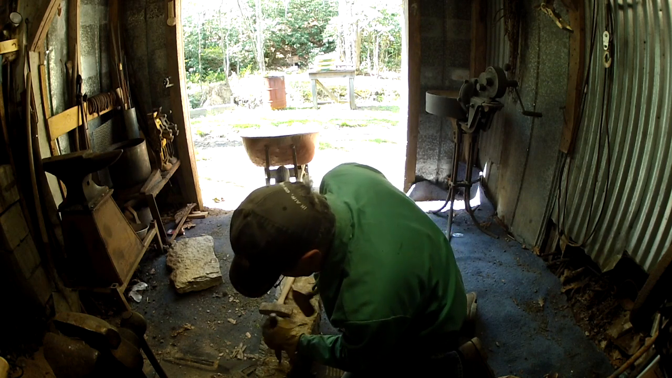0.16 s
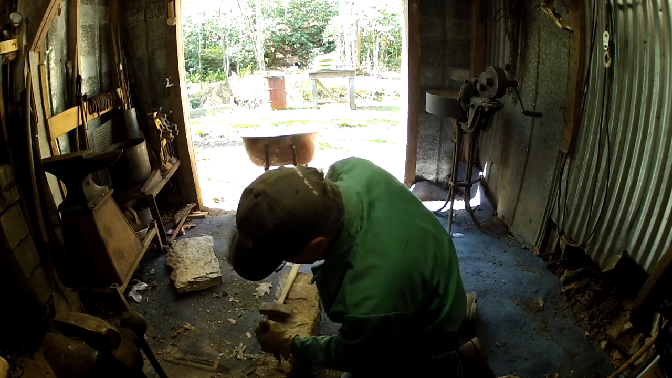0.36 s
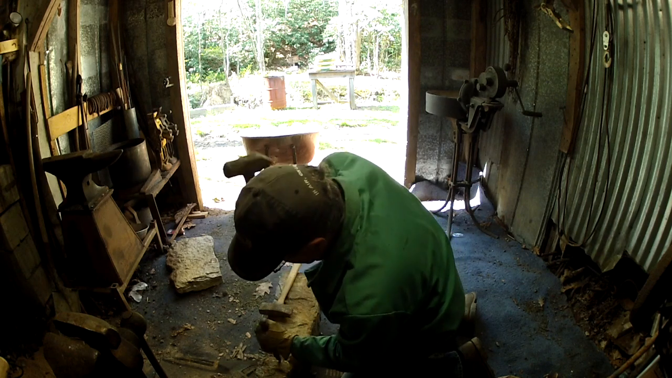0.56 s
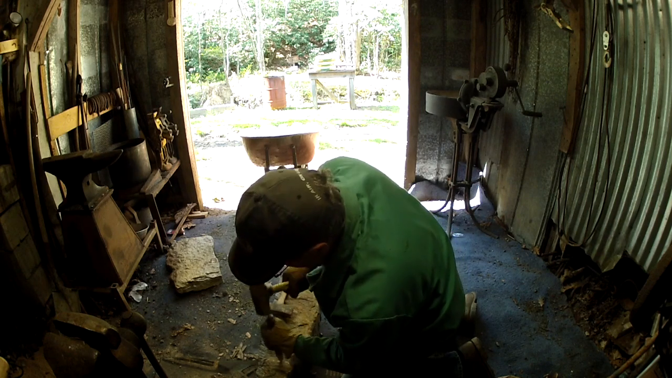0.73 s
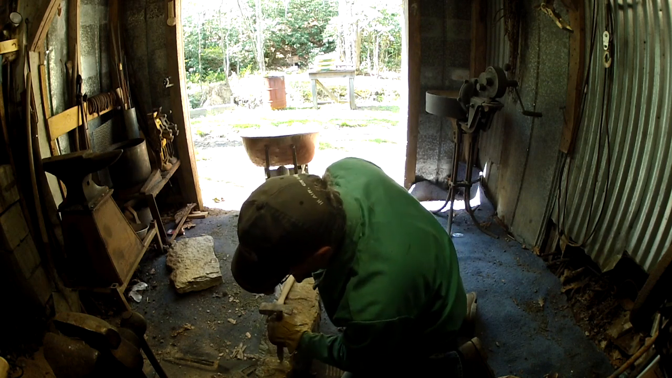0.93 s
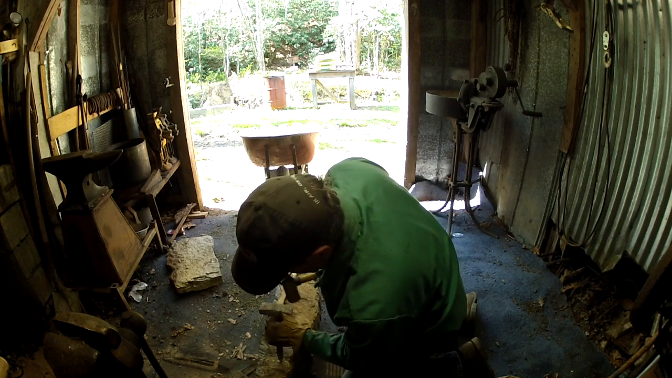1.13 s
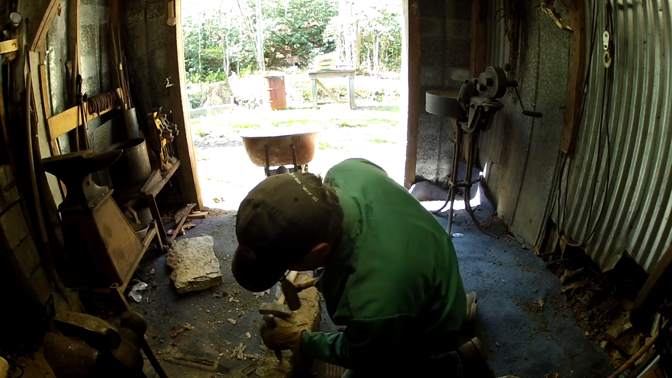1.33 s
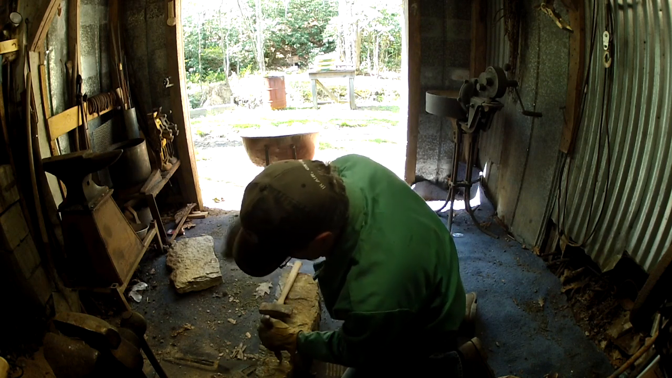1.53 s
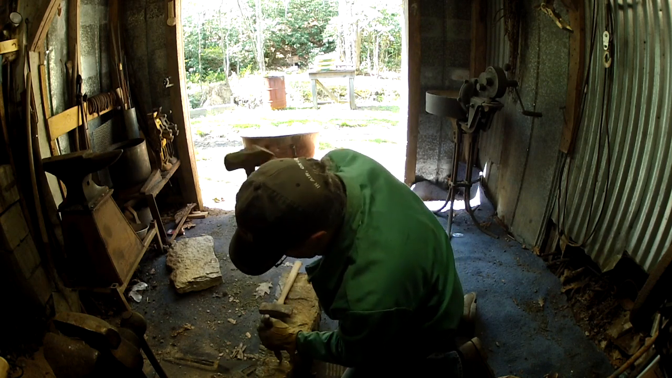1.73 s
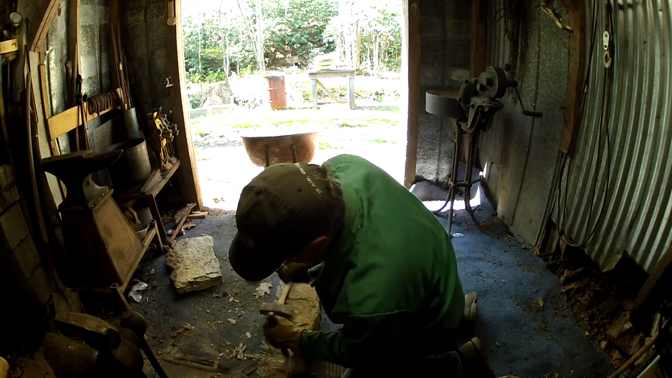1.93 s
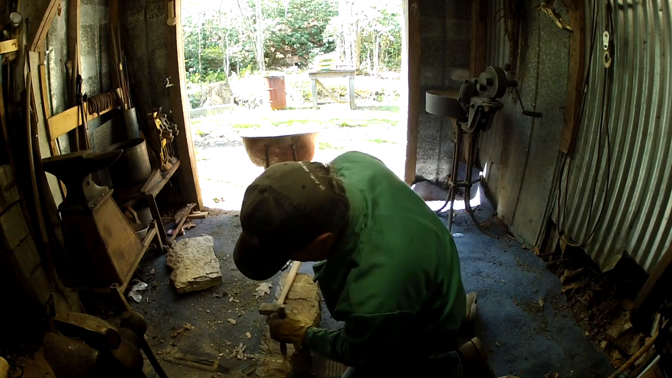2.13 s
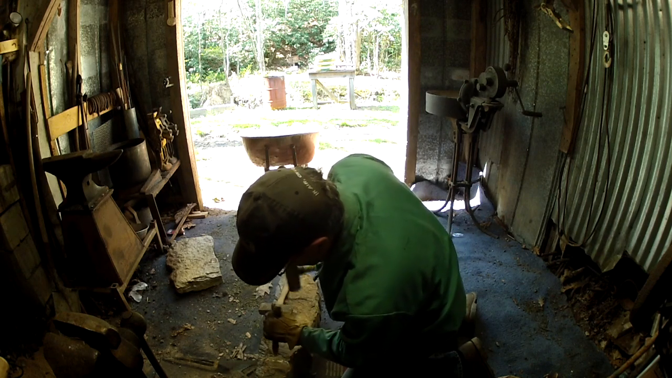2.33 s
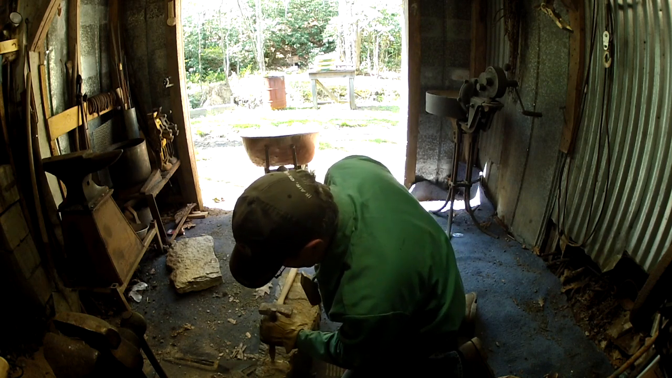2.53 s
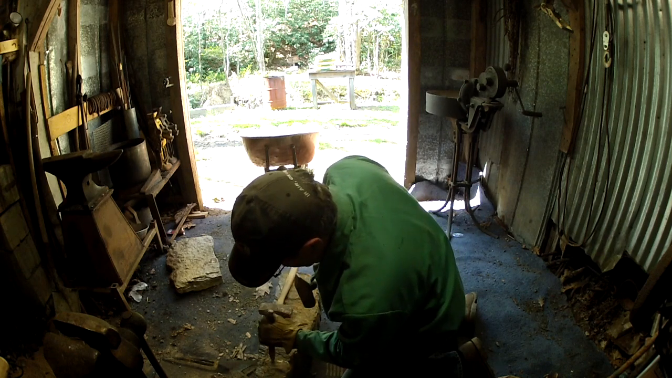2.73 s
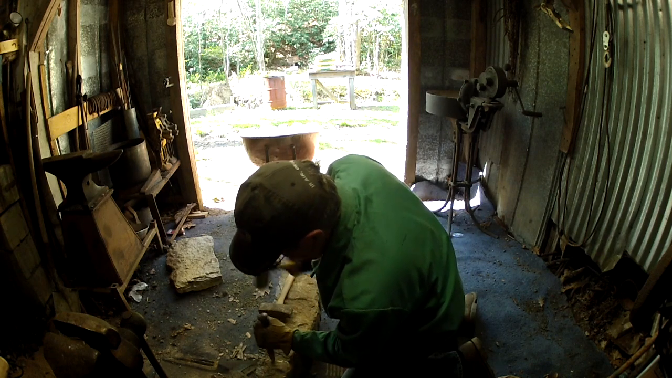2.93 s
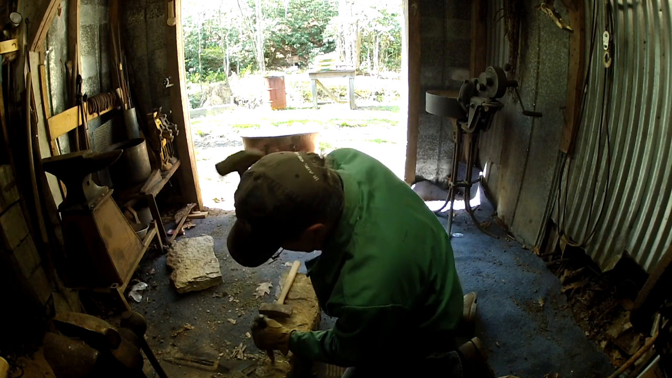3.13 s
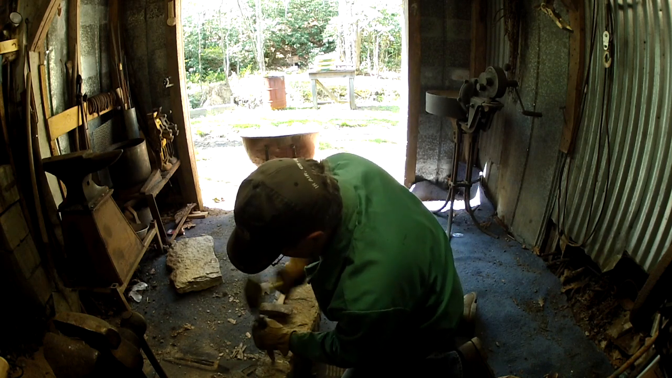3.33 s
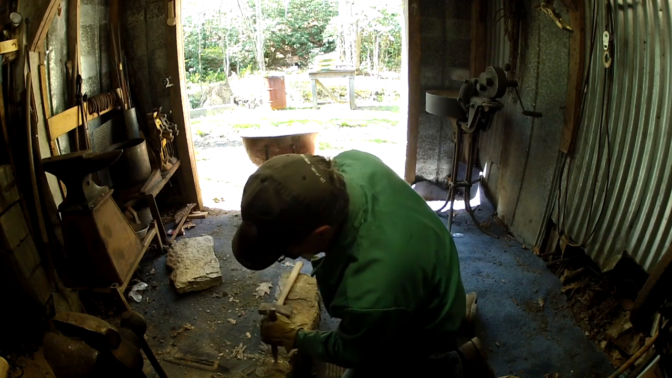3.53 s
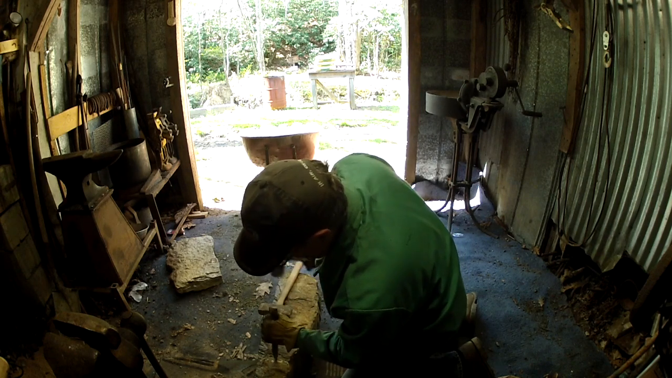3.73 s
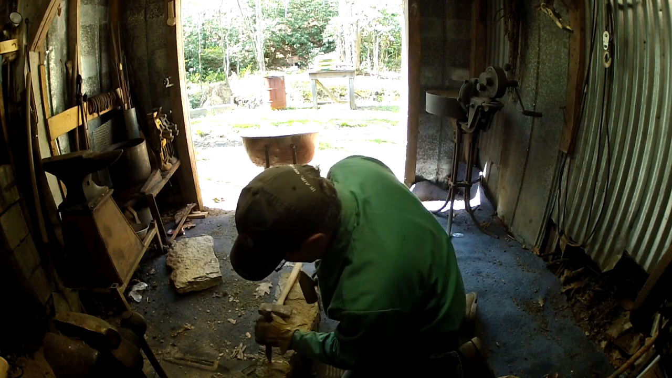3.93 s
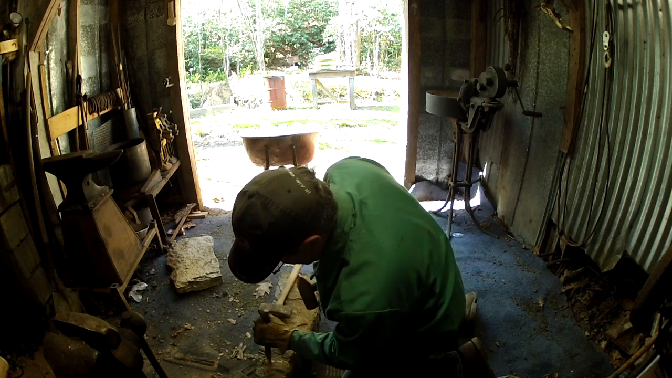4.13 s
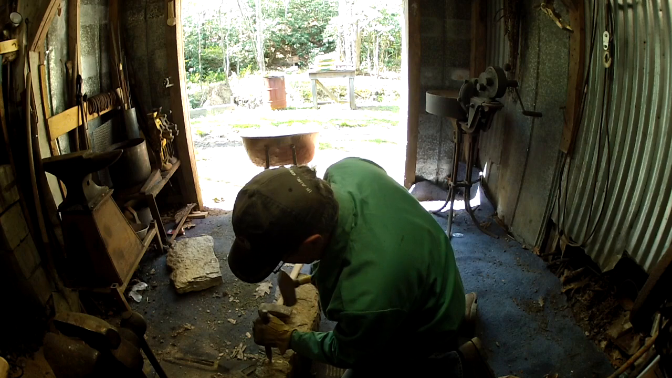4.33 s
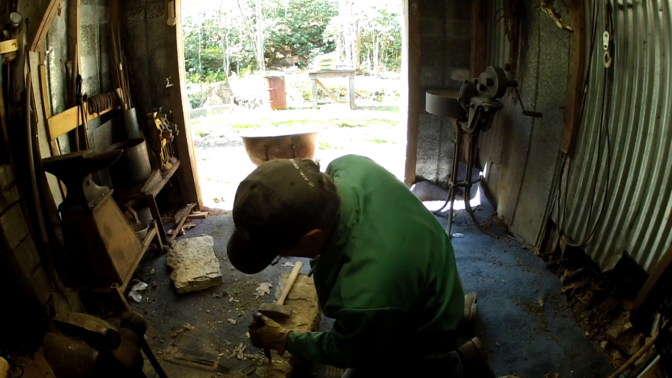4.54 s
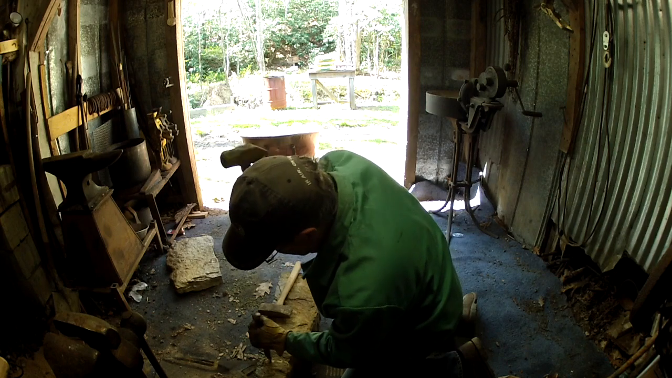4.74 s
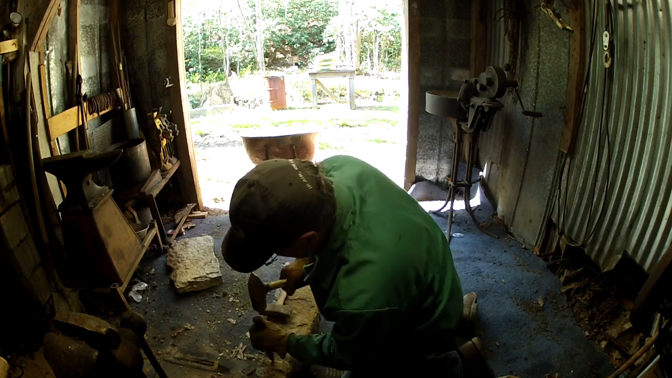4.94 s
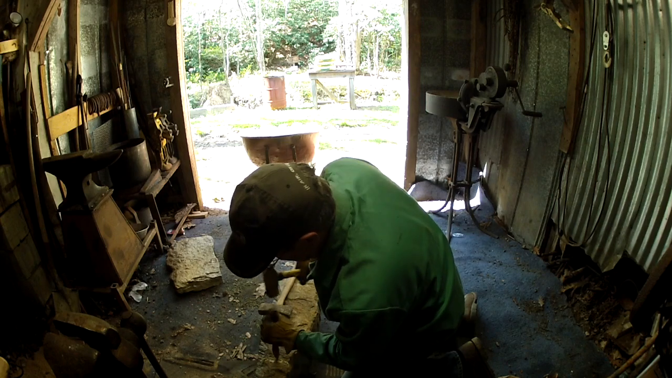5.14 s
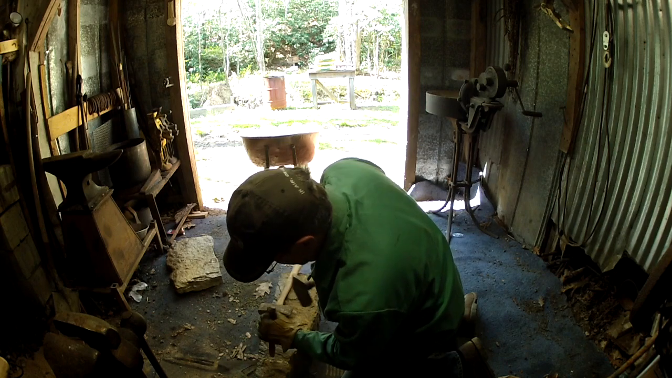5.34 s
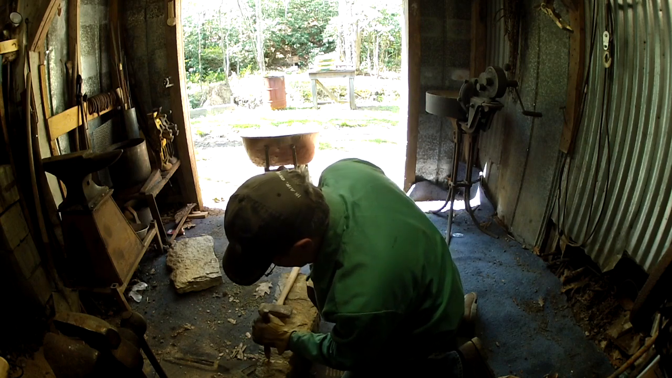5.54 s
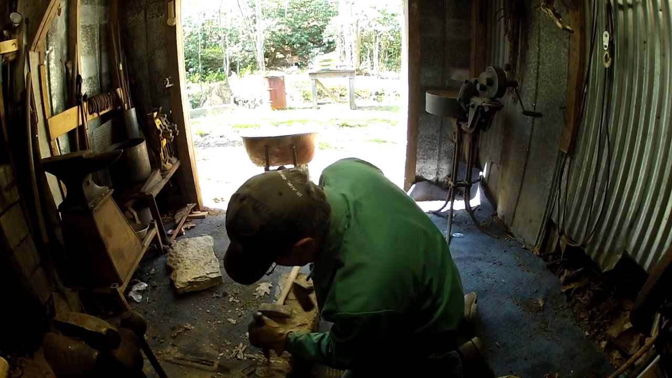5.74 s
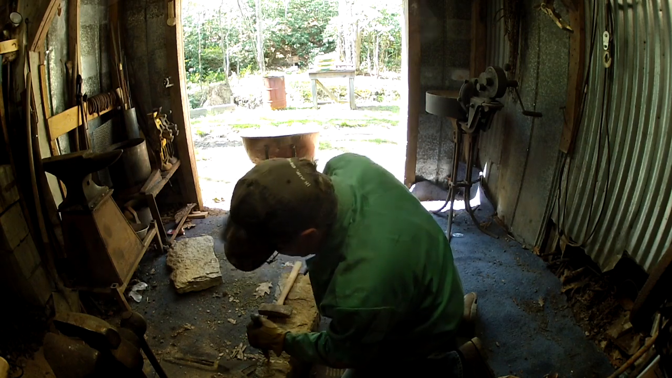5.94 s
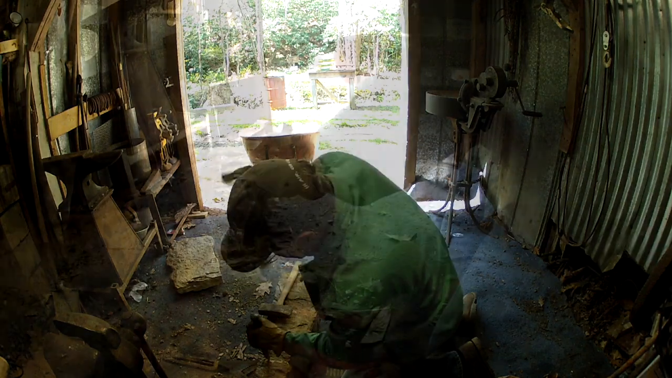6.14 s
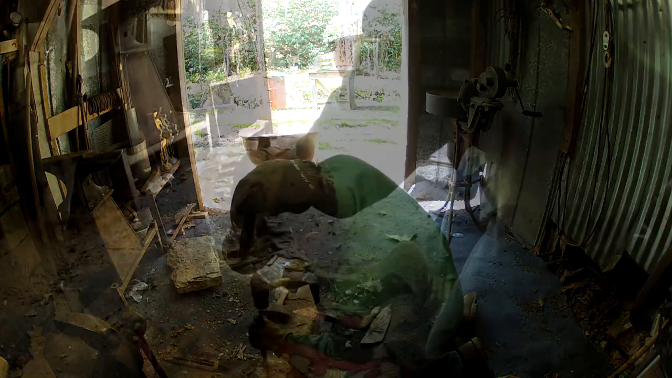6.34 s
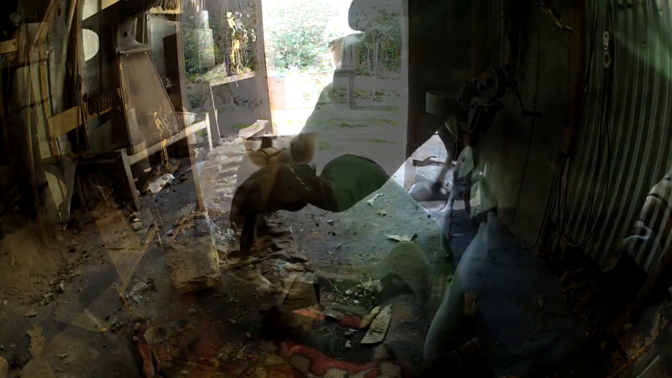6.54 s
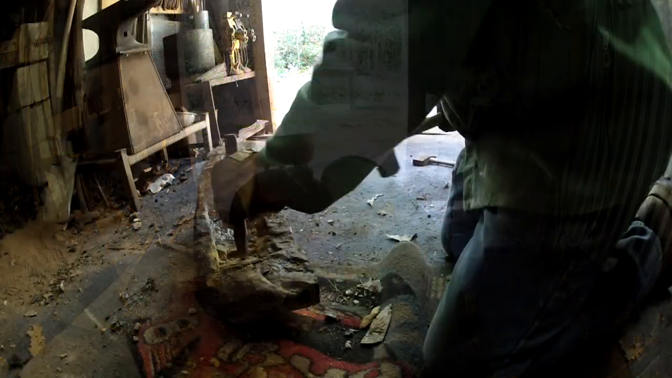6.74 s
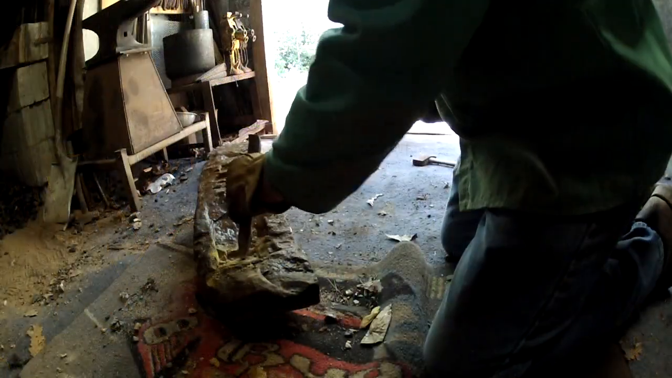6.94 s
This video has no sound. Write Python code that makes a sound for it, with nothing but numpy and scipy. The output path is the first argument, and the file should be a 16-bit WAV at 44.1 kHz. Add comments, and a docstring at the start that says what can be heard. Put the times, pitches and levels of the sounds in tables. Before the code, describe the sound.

A hammer cracks a chisel into a stone block at a slow pace, short dry metallic clinks, faint falling crumbs, steady mains hum and rumble beneath.

```python
"""A hammer drives a steel chisel into a stone block on the floor of a small tin shed.
Each blow mixes fading sine tones for steel and stone with short noise bursts; chips and crumbs land after some.
A mains hum and a low rumble fill the shed; near the end the sound dissolves into a second shot with a weaker hum.
The small camera turns itself down after each blow, adding deep soft thumps (partly drawn as plain low tones);
it also clips, and holds each sample of a 12 kHz converter."""
import sys
import numpy as np
from scipy import signal
from scipy.fft import rfft, irfft
from scipy.io import wavfile
from scipy.ndimage import uniform_filter1d

SR = 44100
rng = np.random.default_rng(int(sys.argv[2]) if len(sys.argv) > 2 else 0)


def to_wav(s):
    """Save 16-bit WAV."""
    ch = np.atleast_2d(s).T  # columns
    pcm = np.round(np.clip(ch, -1, 1) * 32767)  # PCM
    wavfile.write(sys.argv[1], SR, pcm.astype(np.int16))


N = 312228   # length in samples, about 7 s
AFTER = np.arange(SR // 2) / SR   # seconds since a contact

# hammer on chisel: start_s, force_db, ring_share (part of the free ringing time), then levels relative
# to the force: crack_db, grit_db, block_db, thud_db, deep_db (low thump of the camera's moving gain); last thud_hz
HAMMER_BLOWS = [(0.7591, -4, 0.37, 2.5, 3.5, 1, 11.5, -40, 302),
                (1.9385, -1, 0.36, 1, -10, 0.5, 0, -9.5, 338),
                (3.4026, 3.5, 0.35, 2, -10.5, -2.5, -0.5, -15, 370),
                (4.9403, -1, 0.48, -1, -3.5, -12.5, 4, -30, 342),
                (6.312, -4.5, 0.81, 4, -2, -14.5, 3, -32, 337)]


def blows():
    """Full blows ring the steel and crumble the stone, with a short thud and a brief low thump from the camera."""
    out = np.zeros(N)
    for start_s, force_db, ring_share, crack_db, grit_db, block_db, thud_db, deep_db, thud_hz in HAMMER_BLOWS:
        thud_shape = dying(0.018) * (1 - dying(0.0064))
        thud = from_db(thud_db) * np.sin(2 * np.pi * thud_hz * AFTER) * thud_shape
        deep = from_db(deep_db) * deep_thump(0.03, rise_s=0.0033)
        stone = steel_on_stone(crack_db, block_db, ring_share) + from_db(grit_db) * grit(0.12)
        out = in_shed(out, start_s, from_db(force_db) * (stone + thud + deep))
    return out


# chisel set back on the stone: start_s, force_db
CHISEL_TAPS = [(2.6033, -35.5), (4.04, -56), (5.601, -43)]
TAP_RING_SHARE, TAP_CRACK_DB, TAP_BLOCK_DB = 0.5, -5, -5


def taps():
    """Light touches of the chisel ring steel and stone, without the grit and thuds of a full blow."""
    out = np.zeros(N)
    for start_s, force_db in CHISEL_TAPS:
        contact = steel_on_stone(TAP_CRACK_DB, TAP_BLOCK_DB, TAP_RING_SHARE)
        out = in_shed(out, start_s, from_db(force_db) * contact)
    return out


# tones of the steel chisel: pitch_hz, level_db, t60_s (time to lose 60 dB when ringing freely)
CHISEL_TONES = [(2275, -5, 0.22), (2326, -4.5, 0.17), (2345, -21.5, 0.31), (5650, -6, 0.12)]
# tones of the stone block: pitch_hz, level_db, t60_s
BLOCK_TONES = [(570, -8, 0.016), (753, -8.5, 0.0092), (1113, 1, 0.053), (1230, -2, 0.0061),
               (1770, -5, 0.0017), (3200, -31.5, 0.036), (3650, -7.5, 0.034), (4230, -5.5, 0.004),
               (4660, -34, 0.004)]
# colour of the cracking noise: pitch_hz, level_db (per Hz)
CRACK_COLOUR = [(150, -15.5), (500, -7.5), (1000, -12), (2500, -4.5), (4000, 1), (6000, 1.5), (9000, -24)]


def steel_on_stone(crack_db, block_db, ring_share):
    """The chisel rings, the stone cracks in a short noise burst, the block rings briefly."""
    crack = coloured(CRACK_COLOUR, size=AFTER.size) * dying(0.019) * (1 - dying(0.0017))
    chisel = ringing(CHISEL_TONES, spread_db=2.0, share=ring_share)
    block = ringing(BLOCK_TONES, spread_db=4.5)
    return chisel + from_db(crack_db) * crack + from_db(block_db) * block


# colour of the crumbling noise: pitch_hz, level_db (per Hz)
GRIT_COLOUR = [(150, -4.5), (500, -6.5), (1200, -3), (2500, -5.5), (4300, -10), (6000, -17.5),
               (9000, -10.5)]


def grit(t60):
    """Crumbs of stone: noise broken into uneven grains, dying away."""
    grain = 60   # samples, about 1.4 ms
    strengths = rng.exponential(1, AFTER.size // grain + 1) ** 1.1
    strengths = uniform_filter1d(strengths, size=2)
    grains = rms_one(np.repeat(strengths, grain)[:AFTER.size])
    return coloured(GRIT_COLOUR, size=AFTER.size) * grains * dying(t60)


DEEP_HZ = 55.7


def deep_thump(t60, rise_s):
    """A deep soft thump of the camera's moving gain, drawn as one low tone that swells and dies."""
    return np.sin(2 * np.pi * DEEP_HZ * AFTER) * dying(t60) * (1 - dying(rise_s))


# broken-off pieces landing: start_s, level_db, tilt_db (brightness per octave), rattle_db, rattle_t60_s,
# deep_db (low thump of the camera's gain, relative to level_db)
FALLING_CHIPS = [(.852, -37, -8, -12, .045, -30), (2.0577, -24.5, -3, -6, .08, -11),
                 (3.506, -31, 3, -6, .25, -7)]
BOUNCE_S, BOUNCE_LOSS_DB = 0.03, 8
# single crumbs landing: start_s, level_db
FALLING_CRUMBS = [(3.769, -65), (3.831, -62), (4.275, -60), (5.168, -52.5)]
CRUMB_TILT_DB, CRUMB_RATTLE_DB, CRUMB_RATTLE_S = 4, 7, 0.07


def chips():
    """Pieces touch three times, ever softer; a deep soft thump comes with the second touch; crumbs touch once."""
    out = np.zeros(N)
    for start_s, level_db, tilt_db, rattle_db, rattle_s, deep_db in FALLING_CHIPS:
        for bounce in range(3):
            touch = landing(tilt_db, rattle_db, rattle_s)
            touch_db = level_db - BOUNCE_LOSS_DB * bounce
            out = in_shed(out, start_s + BOUNCE_S * bounce ** 1.2, from_db(touch_db) * touch)
        # stands for the camera's gain as it finishes climbing back
        deep = from_db(level_db + deep_db) * deep_thump(0.25, rise_s=0.02)
        out = in_shed(out, start_s + BOUNCE_S, deep)
    for start_s, level_db in FALLING_CRUMBS:
        touch = landing(CRUMB_TILT_DB, CRUMB_RATTLE_DB, CRUMB_RATTLE_S)
        out = in_shed(out, start_s, from_db(level_db) * touch)
    return out


# tones of a small stone piece, before the brightness tilt: pitch_hz, level_db, t60_s
PIECE_TONES = [(490, -9, .025), (1380, 0, .045), (2570, -2, .04), (4030, -10, .025)]


def landing(tilt_db, rattle_db, rattle_s):
    """One touch of the floor: a gritty rattle and the short tones of the piece."""
    # the tilt turns around 2000 Hz
    tones = [(hz, db + tilt_db * np.log2(hz / 2000), t60) for hz, db, t60 in PIECE_TONES]
    return ringing(tones, spread_db=1.5) + from_db(rattle_db) * grit(rattle_s)


def ringing(modes, spread_db, share=1):
    """Every tone is struck once, with a strength and slight pitch of its own; a grip shortens the ring."""
    hz, db, t60 = np.transpose(modes)[:, :, None]
    chance = rng.standard_normal((2, len(modes), 1))
    sines = np.sin(2 * np.pi * hz * (1 + 0.002 * chance[0]) * AFTER)
    strengths = from_db(db + spread_db * chance[1])
    return np.sum(strengths * dying(t60 * np.clip(share, 0.2, 2)) * sines, axis=0)


def dying(t60):
    """Fade that loses 60 dB in t60 seconds."""
    return 1000.0 ** (-AFTER / t60)


# how long the shed's main echo lasts: pitch_hz, t60_s
SHED_ECHO = [(100, 0.12), (500, 0.12), (1500, 0.082), (3000, 0.11), (6000, 0.13)]
SHED_DB, SHED_FIRST_S = -2.5, 0.003   # echo strength and wait before the first echo
WALLS_DB, WALLS_T60_S = -34.5, 0.53   # the tin walls keep a faint echo going for longer


def in_shed(out, start_s, contact):
    """Add a contact and its shed echoes, made of fading noise bands that differ with each spot struck."""
    echoes = np.zeros(AFTER.size)
    edges = 70 * 2.0 ** np.arange(8)   # octave bands, in Hz
    for low, high in zip(edges, edges[1:]):
        band = signal.butter(2, [low, high], "band", fs=SR, output="sos")
        noise = signal.sosfilt(band, rng.standard_normal(AFTER.size))
        main_fade = dying(at_hz(SHED_ECHO, np.sqrt(low * high)))
        echoes += noise * (main_fade + from_db(WALLS_DB) * dying(WALLS_T60_S))
    echoes = echoes * (AFTER > SHED_FIRST_S)
    echoes = from_db(SHED_DB) * echoes / np.sqrt(np.sum(echoes ** 2))
    sound = contact + signal.fftconvolve(contact, echoes)[:AFTER.size]
    start = round(start_s * SR)
    placed = np.zeros(N + AFTER.size)
    placed[start:start + AFTER.size] = sound
    return out + placed[:N]


# colour of the low rumble: pitch_hz, level_db (per Hz)
RUMBLE_COLOUR = [(15, -25), (40, -21), (80, -14), (160, -16), (280, -7.5), (380, -16), (600, -18),
                 (1000, -24), (1500, -31), (2000, -32.5), (2350, -30.5), (2900, -35), (5500, -41),
                 (8000, -63.5)]
HUM_HZ = 120.0
HUM_DB, RUMBLE_DB = -41, -43   # first shot
SECOND_HUM_DB, SECOND_RUMBLE_DB = -8.5, -1   # second shot, relative to the first
SECOND_HUM_TURNS = 0.43   # where in its cycle the second hum starts


def background(hum_db, rumble_db, turns):
    """A hum at twice the mains rate that wavers a little, over a nearly steady rumble of coloured noise."""
    cycles = HUM_HZ * np.arange(N) / SR + turns
    hum = np.sqrt(2) * np.sin(2 * np.pi * cycles + 0.05 * drift(4.0))
    hum = hum * from_db(hum_db + 1.2 * drift(4.0))
    rumble = coloured(RUMBLE_COLOUR, size=N) * from_db(rumble_db + 0.13 * drift(1.0))
    return hum + rumble


def drift(rate):
    """Slow random wandering of spread 1; a higher rate (Hz) wanders faster."""
    step = 40   # samples between the points that are computed
    r = np.exp(-2 * np.pi * step * rate / SR)
    noise = rng.standard_normal(N // step + 2002)
    slow = signal.lfilter([1], [1, -2 * r, r * r], noise)[2000:]   # drop the filter's start-up
    return np.interp(np.arange(N) / step, np.arange(len(slow)), rms_one(slow))


def coloured(spectrum, size):
    """Noise with the given spectrum, rms 1."""
    hz = np.maximum(np.fft.rfftfreq(size, 1 / SR), 1)
    white = rfft(rng.standard_normal(size))
    return rms_one(irfft(white * from_db(at_hz(spectrum, hz)), size))


def at_hz(points, hz):
    """Read a table at any pitch, between its points on a log-pitch axis."""
    points = np.array(points)
    return np.interp(np.log(hz), np.log(points[:, 0]), points[:, 1])


def from_db(db):
    """Decibels to gain."""
    return 10 ** (np.asarray(db) / 20)


def rms_one(x):
    """Scale to unit rms."""
    return x / np.sqrt(np.mean(x ** 2) + 1e-20)


DUCK_START_DB, DUCK_STEP_DB = -15.5, 0.45
DUCK_WAIT_S, DUCK_ATTACK_S = 0.0012, 0.0013
DUCK_RELEASE_DB_S = 140   # dB regained per second


def duck_gain(x):
    """A loud burst pulls the gain down within milliseconds; it climbs back in small even steps."""
    level = signal.lfilter([0.01], [1, -0.99], np.abs(x))
    over_db = np.maximum(20 * np.log10(level + 1e-9) - DUCK_START_DB, 0)
    # hold the highest excess while letting it sink at the release rate
    ramp = DUCK_RELEASE_DB_S * np.arange(N) / SR
    held_db = np.maximum.accumulate(over_db + ramp) - ramp
    r = np.exp(-1 / (DUCK_ATTACK_S * SR))
    smooth_db = signal.lfilter([(1 - r) ** 2], [1, -2 * r, r * r], held_db)
    smooth_db = np.interp(np.arange(N) - DUCK_WAIT_S * SR, np.arange(N), smooth_db)
    return from_db(-DUCK_STEP_DB * np.round(smooth_db / DUCK_STEP_DB))


CONVERTER_EDGE_HZ, CAMERA_TOP_HZ, COUPLING_HZ = 5650, 15300, 25.3
OFFSET_DB = -22   # standing voltage ahead of the gain control, unequal between the channels
OFFSET_LOW_HZ, OFFSET_TOP_HZ = 45, 413   # band in which that voltage is heard to move


def camera(heard):
    """Gain control, anti-alias filter, clipping and held 12 kHz samples, which mirror the sound above 6 kHz."""
    gain = duck_gain(heard)
    mid = signal.sosfilt(signal.butter(6, CONVERTER_EDGE_HZ, fs=SR, output="sos"), gain * heard)
    samples = np.clip(signal.resample_poly(mid, 40, 147), -0.92, 0.92)   # to 12 kHz
    held = signal.resample_poly(np.repeat(samples, 4), 147, 160)[:N]   # held at 48 kHz, back to SR
    held = signal.sosfilt(signal.ellip(6, 0.5, 40, CAMERA_TOP_HZ, fs=SR, output="sos"), held)
    held = np.pad(held, (0, N - held.size))
    held = signal.sosfilt(signal.butter(2, COUPLING_HZ, "high", fs=SR, output="sos"), held)
    # the moving gain scales the standing voltage, so each duck leaves a soft thump between the sides
    band = signal.butter(1, [OFFSET_LOW_HZ, OFFSET_TOP_HZ], "band", fs=SR, output="sos")
    thump = from_db(OFFSET_DB) * signal.sosfilt(band, gain - 1)
    thump = signal.sosfilt(signal.butter(2, OFFSET_TOP_HZ, fs=SR, output="sos"), thump)
    return held + thump * np.array([[1], [-1]])   # left and right


def scene():
    """What the one microphone hears in both shots, with the deep thumps of the camera's gain already mixed in."""
    first = blows() + taps() + chips() + background(HUM_DB, RUMBLE_DB, 0)
    second = background(HUM_DB + SECOND_HUM_DB, RUMBLE_DB + SECOND_RUMBLE_DB, SECOND_HUM_TURNS)
    return np.array([first, second])


DISSOLVE_FROM_S, DISSOLVE_TO_S = 6.0, 6.93
CUTOFF_HZ = 16500


def record(dry):
    """Both shots pass the camera, one dissolves evenly into the other, the top is cut."""
    second = np.interp(np.arange(N) / SR, [DISSOLVE_FROM_S, DISSOLVE_TO_S], [0, 1])
    both = (1 - second) * camera(dry[0]) + second * camera(dry[1])
    top_cut = signal.cheby2(12, 70, CUTOFF_HZ, fs=SR, output="sos")
    return signal.sosfilt(top_cut, np.clip(both, -0.97, 0.97))


dry = scene()
out = record(dry)
to_wav(out)
```